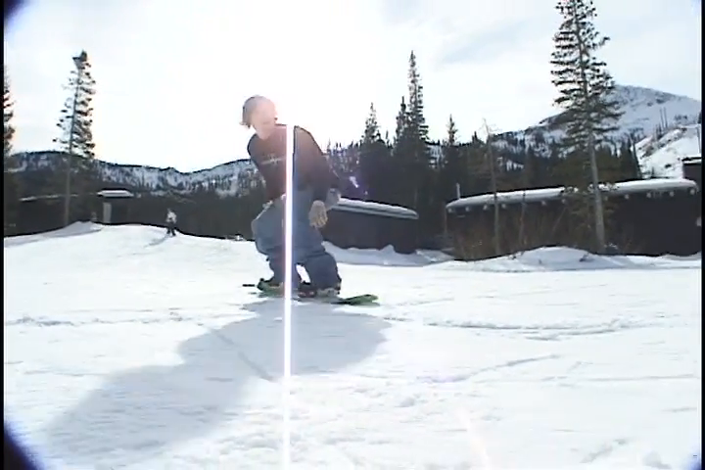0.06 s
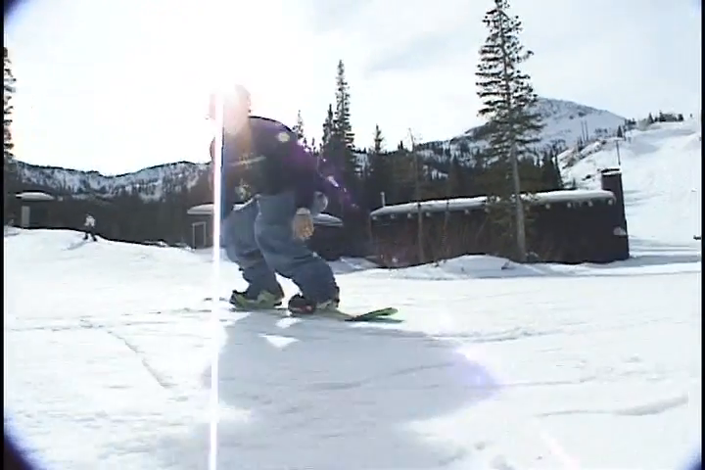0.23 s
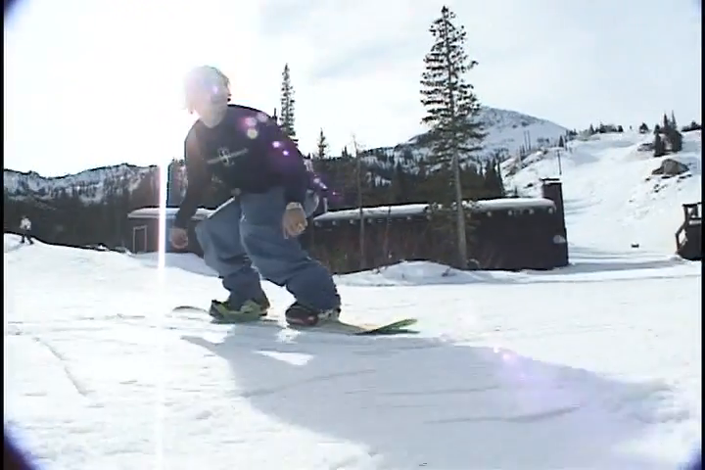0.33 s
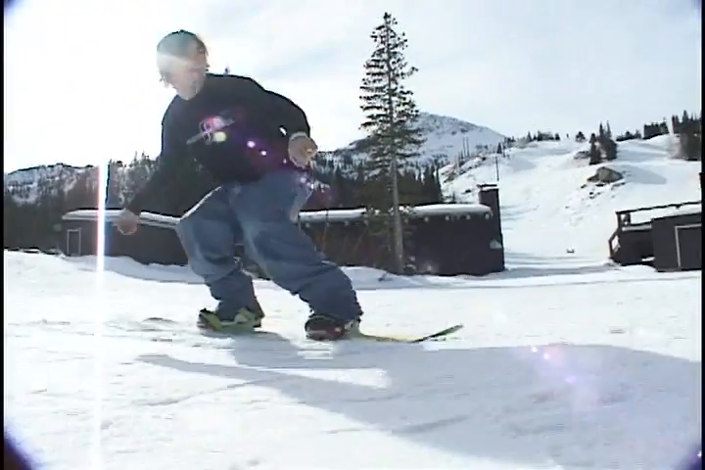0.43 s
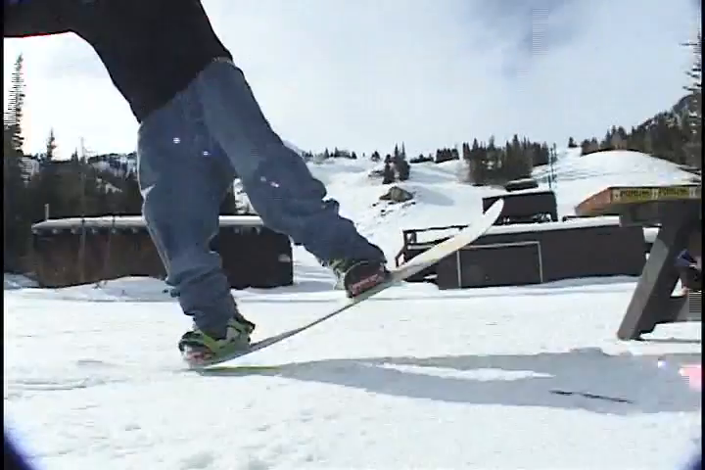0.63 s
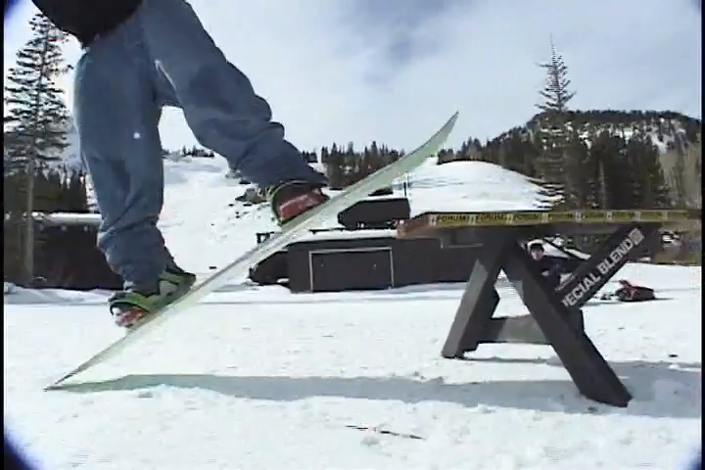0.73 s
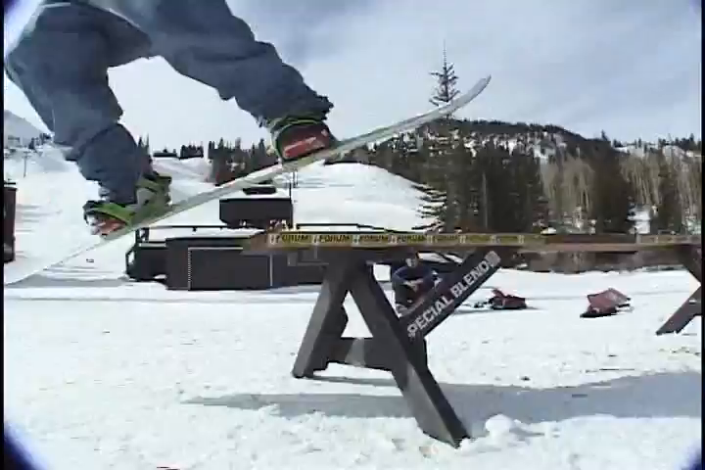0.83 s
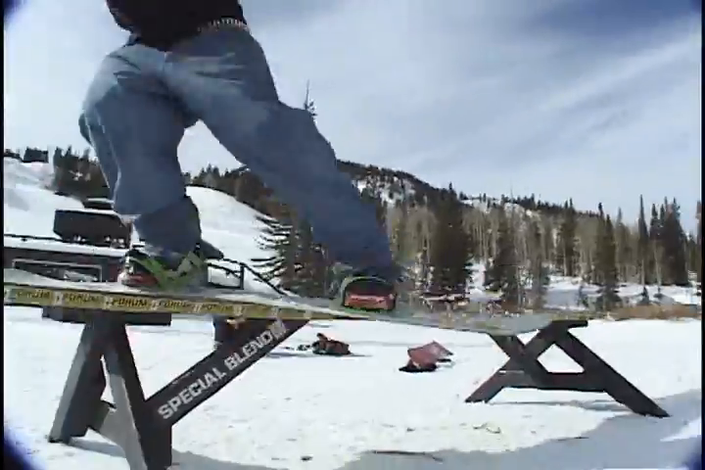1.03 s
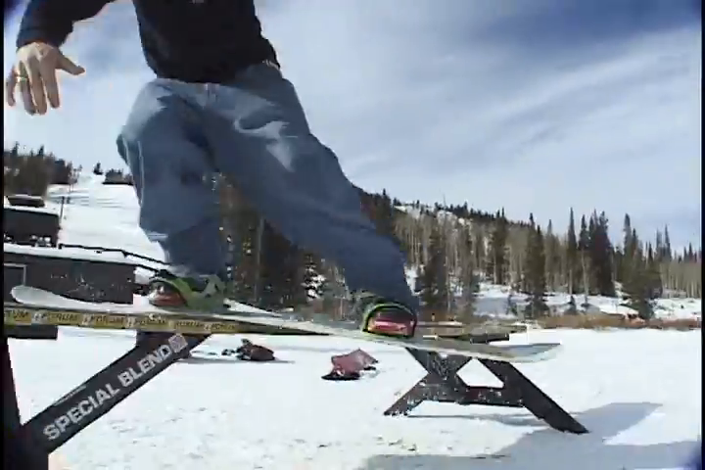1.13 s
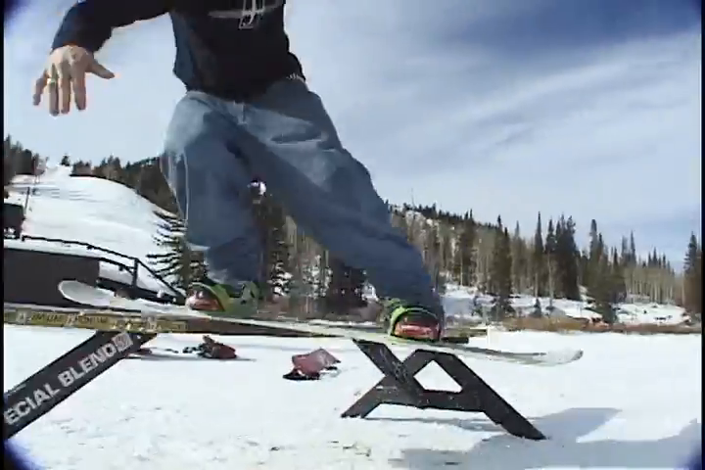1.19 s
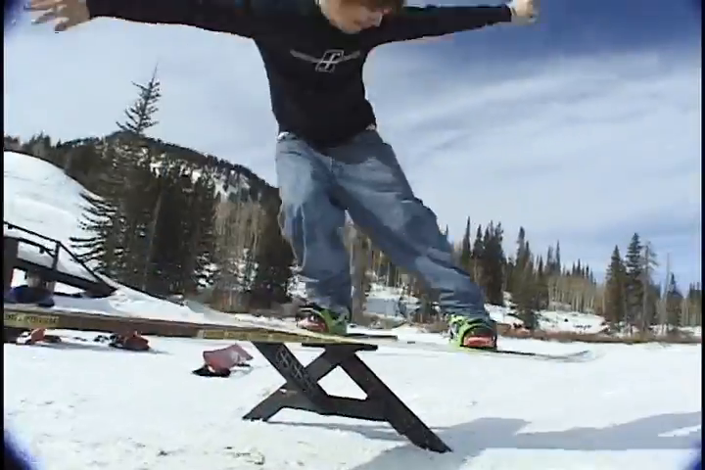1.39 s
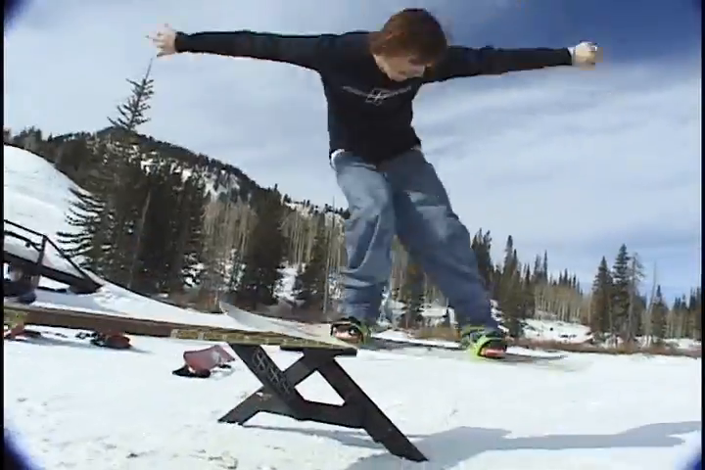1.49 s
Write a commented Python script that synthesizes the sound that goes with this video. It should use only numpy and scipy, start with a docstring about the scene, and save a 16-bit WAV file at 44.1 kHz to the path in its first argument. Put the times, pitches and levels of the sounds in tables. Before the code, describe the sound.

A snowboard hisses over snow, slaps onto a wooden bench and scrapes along it.

```python
"""A snowboard hisses over packed snow towards the listener, rumbling and thumping over bumps.
Its edge bites for the jump, ice crumbs snap, and it rears up on its dragging tail. At 1 s it slaps
down twice on a wooden bench, exciting the normal modes of the wood and overloading the microphone.
It knocks along the plank, scrapes to its end and flies off, leaving the faint wash of wind and
distant slope that lies under the whole scene."""
import sys
import numpy as np
from scipy import signal
from scipy.fft import rfft, irfft, next_fast_len
from scipy.io import wavfile

SR = 44100
rng = np.random.default_rng(int(sys.argv[2]) if len(sys.argv) > 2 else 0)


def wav_record(signal):
    """Record a signal, one row per channel, as 16-bit PCM in the file named by sys.argv[1]."""
    frames = np.transpose(np.atleast_2d(signal))
    bounded = np.clip(frames, -1, 1)
    # unit amplitude maps onto the largest positive 16-bit level
    quanta = np.round(bounded * 32767).astype(np.int16)
    wavfile.write(sys.argv[1], SR, quanta)


N = 68355
TIME = np.arange(N) / SR

# Impacts of the board on the bench: (time [s], strength [dB], crack level [dB])
SLAPS = [(.9967, -2.5, 7.5), (1.0005, 0.5, -1.5), (1.008, -16.5, -5.5), (1.0285, -29, -9),
         (1.0447, -1, 5.5), (1.0495, -11.5, -3), (1.067, -11, -27)]
# Normal modes of bench and board together: (frequency [Hz], level [dB], T60 [s])
BENCH_MODES = [(153.3, -4.5, 0.56), (250.3, -7.5, 0.13), (265.3, -10.5, 0.19), (348, 3, 0.084),
               (365, -10, 0.17), (430.3, -5, 0.17), (598, -8.5, 0.14), (684, -12, 0.16), (729, -11, 0.32),
               (793, -17, 0.2), (834, -22, 0.41), (925, -8, 0.22), (1026, -10.5, 0.16), (1081.6, -12, 0.13),
               (1386, 0, 0.029), (1765, -10, 0.1)]
# Spectra of the crack and of the shuddering trestles: (frequency [Hz], level [dB])
CRACK_SPECTRUM = [(80, -4), (200, -3), (500, 2), (1100, -1), (1800, -6), (3000, -13.5), (6000, -22),
                  (10000, -28.5), (15000, -34)]
CLATTER_SPECTRUM = [(45, -32), (130, 10), (260, 2), (400, 9), (750, 1), (1050, 11), (1300, -20),
                    (2500, -20), (6000, -26), (14000, -50)]
def bench_slaps():
    """Impulse excitation: each slap rings the modes; its crack and trestle clatter add in power."""
    coupling = from_db(rng.standard_normal((len(BENCH_MODES), len(SLAPS))))  # 1 dB spread
    blows = np.array([from_db(db) * click(s) for s, db, _ in SLAPS])
    wood = sum(from_db(db) * ring(force, hz, t60)
               for force, (hz, db, t60) in zip(coupling @ blows, BENCH_MODES))
    crack_power = sum((from_db(db + 4.5) * decay(s, t60=.032)) ** 2 for s, _, db in SLAPS)
    clatter_power = sum((from_db(db - 13) * decay(s, t60=.26)) ** 2 for s, db, _ in SLAPS)
    crack = noise(CRACK_SPECTRUM) * np.sqrt(crack_power)
    clatter = noise(CLATTER_SPECTRUM) * np.sqrt(clatter_power)
    return wood + crack + clatter


# Contacts with bumps and with the plank: (time [s], strength [dB], cut-off [Hz])
KNOCKS = [(0.091, -30, 390), (.1895, -11.5, 600), (.1945, -12, 674), (0.2227, -7, 300), (0.23, -14, 253),
          (0.272, -19, 250), (0.4531, -8.5, 710), (0.513, -23, 700), (0.538, 0.5, 260), (0.5464, -3.5, 240),
          (0.56, -15, 250), (0.81, -22.5, 397), (1.1412, -4.5, 1210), (1.1476, -6, 690), (1.1583, 1, 600),
          (1.1667, 3, 244), (1.2569, -5.5, 670)]
# Normal modes of the board, damped by the rider's boots: (frequency [Hz], level [dB], T60 [s])
BOARD_MODES = [(141, -17, 0.19), (195, -6.5, 0.07), (252, -4, 0.043), (377, -2, 0.024), (508, 3, 0.036),
               (600, -44, 0.089), (778, 0, 0.018), (1065, -2, 0.027)]
def board_knocks():
    """Contact bandwidth: knocks ring the board and crush snow; harder contacts reach higher pitches."""
    force = sum(from_db(db) * butterworth(click(s), hz) for s, db, hz in KNOCKS)
    board = sum(from_db(db) * ring(force, hz, t60) for hz, db, t60 in BOARD_MODES)
    snow = rng.standard_normal(N)
    crunch = sum(from_db(db) * butterworth(snow * decay(s, t60=.04) + 1e-18, [94, hz], "band")
                 for s, db, hz in KNOCKS)
    return from_db(-2) * board + from_db(4) * crunch


# Envelope of the scrape on the plank: (time [s], level [dB])
SCRAPE_ENVELOPE = [(.997, -50), (1.005, -29.5), (1.06, -13.5), (1.078, -14), (1.1, -13), (1.122, -23.5),
                   (1.155, -19.5), (1.176, -14.5), (1.202, -21.5), (1.28, -17), (1.332, -23), (1.36, -21),
                   (1.386, -23), (1.408, -23), (1.43, -35.5), (1.49, -41)]
# Its spectrum: (frequency [Hz], level [dB])
SCRAPE_SPECTRUM = [(80, -7), (220, 1), (350, -9.5), (480, -3), (1000, -5), (1800, -2), (3000, -5),
                   (4700, -6), (6500, -11.5), (9000, -15.5), (11500, -26.5), (15000, -44)]
def bench_scrape():
    """Sliding friction: the base scrapes along the snowy plank until it leaves the end."""
    scrape = friction(SCRAPE_SPECTRUM, grains_per_s=12000, spread_db=1.5, flutter_db=1.56)
    return envelope(SCRAPE_ENVELOPE) * scrape


# Envelopes of the gliding base and the biting edge: (time [s], level [dB])
GLIDE_ENVELOPE = [(0, -29), (.07, -27), (.166, -29), (.19, -23), (.30, -25.5), (.35, -21.5), (.52, -16),
                  (.602, -22.5), (.64, -18), (.70, -21.5), (.745, -20.5), (.76, -32), (.785, -44),
                  (.83, -82)]
BITE_ENVELOPE = [(.61, -53), (.64, -49), (.665, -32), (.70, -19.5), (.742, -21), (.758, -42)]
# Their spectra: (frequency [Hz], level [dB])
GLIDE_SPECTRUM = [(100, -12), (350, -1), (900, -1.5), (1400, -5), (2600, -3.5), (4200, -3), (6200, -5),
                  (8500, -9), (10500, -15.5), (13000, -28), (15000, -40)]
BITE_SPECTRUM = [(500, -38), (950, -3), (1200, -3.5), (2800, -3.5), (3500, -1), (4000, -1), (4600, -4),
                 (5400, -14), (6100, 3), (7200, -23), (12000, -42)]
def snow_hiss():
    """Granular friction: tiny fractures merge into a hiss under the base and, at the jump, the edge."""
    packed_snow = dict(grains_per_s=20000, spread_db=.5, flutter_db=.62)
    glide = envelope(GLIDE_ENVELOPE) * friction(GLIDE_SPECTRUM, **packed_snow)
    bite = envelope(BITE_ENVELOPE) * friction(BITE_SPECTRUM, **packed_snow)
    return glide + bite


# Envelope of the tail's drag at take-off: (time [s], level [dB])
DRAG_ENVELOPE = [(.82, -73), (.828, -30), (.856, -21.5), (.89, -19.5), (.908, -19), (.917, -31),
                 (.938, -25), (.955, -53), (.98, -49), (.992, -66)]
# Its spectrum: (frequency [Hz], level [dB])
DRAG_SPECTRUM = [(100, -18), (400, -13), (620, -4), (860, -2.5), (1070, -10.5), (1750, -2), (2300, -10),
                 (3600, -4.5), (5000, -11), (8000, -12), (11000, -21), (15000, -40.5)]
def tail_drag():
    """Coarse friction: sparser, less even fractures make the tail rasp."""
    rasp = friction(DRAG_SPECTRUM, grains_per_s=10000, spread_db=1.8, flutter_db=1.2)
    return envelope(DRAG_ENVELOPE) * rasp


# Envelope of the rumble: (time [s], level [dB])
RUMBLE_ENVELOPE = [(0, -20), (.05, -54), (.10, -26), (.13, -26), (.175, -40), (.21, -19.5), (.28, -22.5),
                   (.33, -27), (.43, -26), (.55, -17.5), (.61, -27), (.72, -39), (.82, -42), (.95, -69)]
# Its spectrum: (frequency [Hz], level [dB])
RUMBLE_SPECTRUM = [(30, -30), (70, -9.5), (135, 5), (200, 1), (280, 1.5), (400, -7), (700, -18.5),
                   (1300, -51), (3000, -60)]
def board_rumble():
    """Forced vibration: uneven snow shakes the weighted board at low frequencies."""
    return envelope(RUMBLE_ENVELOPE) * noise(RUMBLE_SPECTRUM)


# Ice crumbs breaking under the edge: (time [s], level [dB])
SNAPS = [(0.754, -25), (.763, -38), (.768, -35), (.8252, -16.5), (0.902, -30), (.9075, -27), (0.911, -24),
         (0.9203, -10), (0.9208, -34), (.9277, -17), (0.9348, -15.5), (.972, -32), (0.982, -33),
         (0.988, -43), (1.1304, -11)]
def ice_snaps():
    """Brittle fracture: each crumb gives a short, bright burst of noise."""
    bursts = sum(from_db(db + 2) * decay(s, t60=.009) for s, db in SNAPS)
    return butterworth(bursts * rng.standard_normal(N), [1900, 8200], "band")


# Spectrum of wind and distant slope: (frequency [Hz], level [dB])
AIR_SPECTRUM = [(25, -0.5), (70, 2), (125, 6), (190, -3), (300, -1.5), (600, -7.5), (1200, -11),
                (3000, -18.5), (4500, -19.5), (8500, -22), (12000, -37), (15000, -54)]
def open_air():
    """Stationary noise: a faint, steady wash."""
    return from_db(-34) * noise(AIR_SPECTRUM)


def friction(spectrum, grains_per_s, spread_db, flutter_db):
    """Shot noise: random tiny fractures of uneven size under a fluttering pressure; rms 1."""
    sizes = from_db(spread_db * np.minimum(rng.exponential(1, N), 5))
    signs = rng.choice([-1, 1], N)
    grains = sizes * signs * (rng.random(N) < grains_per_s / SR)
    hiss = coloured(flicker(grains), spectrum)
    pressure = from_db(flutter_db * drift(hz=44))
    return rms_one(hiss * pressure)


def flicker(x, bands=48, depth_db=2.3):
    """Amplitude modulation: each narrow band swells and fades independently."""
    size = next_fast_len(N)
    spectrum = rfft(x, size)
    band_of_bin = np.round((bands - 1) * np.sqrt(np.linspace(0, 1, len(spectrum))))
    return sum(irfft(spectrum * (band_of_bin == k), size)[:N] * from_db(depth_db * drift(hz=28))
               for k in range(bands))


def ring(force, hz, t60):
    """Damped oscillator: the velocity of one mode, of amplitude 1 after a unit impulse."""
    radius, angle = from_db(-60 / (t60 * SR)), 2 * np.pi * hz / SR
    return signal.lfilter([.5, 0, -.5], [1, -2 * radius * np.cos(angle), radius ** 2], force + 1e-18)


def coloured(x, spectrum):
    """Spectral shaping by (frequency [Hz], level [dB]) points; rms 1."""
    hz, db = np.transpose(spectrum)
    size = next_fast_len(N + 4096)
    bin_hz = np.maximum(np.arange(size // 2 + 1) * SR / size, 1)
    gain = from_db(np.interp(np.log(bin_hz), np.log(hz), db))
    bass_rolloff = np.minimum(bin_hz / hz[0], 1)
    return rms_one(irfft(rfft(x, size) * gain * bass_rolloff, size)[:N])


def noise(spectrum):
    """Gaussian noise of a given spectrum; rms 1."""
    return coloured(rng.standard_normal(N), spectrum)


def drift(hz):
    """Low-passed noise: a random wander of rms 1."""
    return rms_one(butterworth(rng.standard_normal(N + SR // 10), hz)[-N:])


def envelope(points):
    """Gain through (time [s], level [dB]) points, silent outside them."""
    times, db = np.transpose(points)
    return from_db(np.interp(TIME, times, db, left=-120, right=-120))


def decay(start, t60):
    """Exponential decay from 1 at start, falling 60 dB in t60 seconds."""
    age = TIME - start
    return (age >= 0) * from_db(-60 * np.maximum(age, 0) / t60)


def click(start):
    """Unit impulse."""
    return 1.0 * (np.arange(N) == int(start * SR))


def butterworth(x, hz, kind="low"):
    """Maximally flat filter with skirts of 12 dB per octave."""
    return signal.sosfilt(signal.butter(2, hz, kind, fs=SR, output="sos"), x)


def from_db(db):
    """Decibels to amplitude ratio."""
    return 10 ** (np.asarray(db) / 20)


def rms_one(x):
    """Normalisation to rms 1."""
    return x / np.sqrt(np.mean(x ** 2) + 1e-20)


def scene():
    """Superposition: open air, run-in and bench contacts add in one channel."""
    run_in = open_air() + snow_hiss() + tail_drag() + board_rumble() + ice_snaps()
    return (run_in + board_knocks() + bench_slaps() + bench_scrape())[None]


def record(dry, clip_level=.88):
    """Band limiting and saturation: the microphone loses deep bass and top, and overloads on slaps."""
    thin = butterworth(dry, 46.7, "high")
    clipped = thin / (1 + (thin / clip_level) ** 4) ** .25
    return signal.sosfilt(signal.ellip(10, .1, 90, 15500, fs=SR, output="sos"), clipped)


dry = scene()
out = record(dry)
wav_record(out)
```